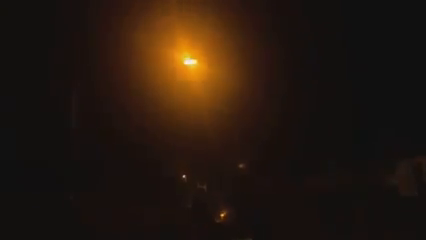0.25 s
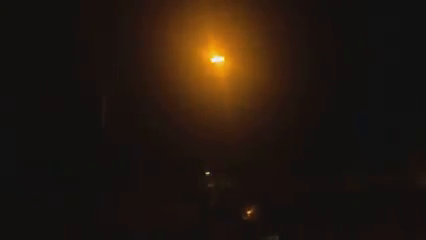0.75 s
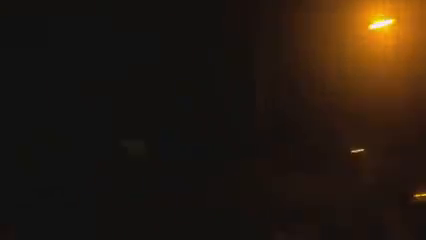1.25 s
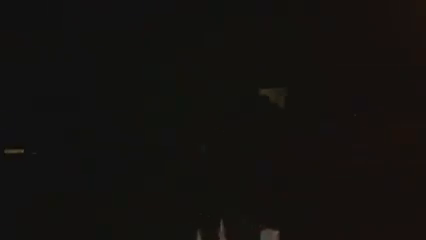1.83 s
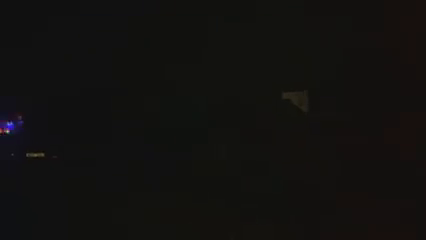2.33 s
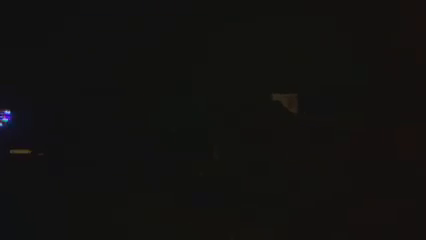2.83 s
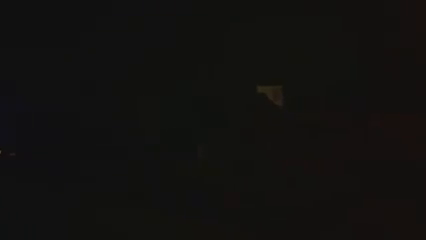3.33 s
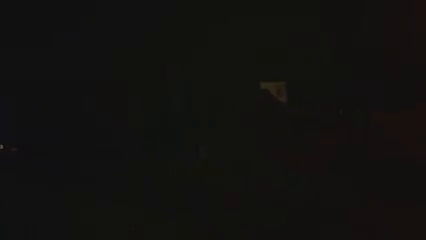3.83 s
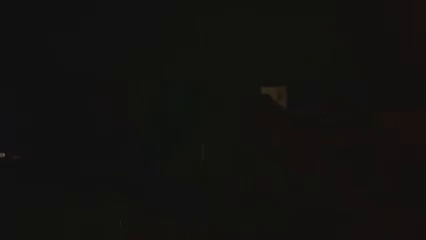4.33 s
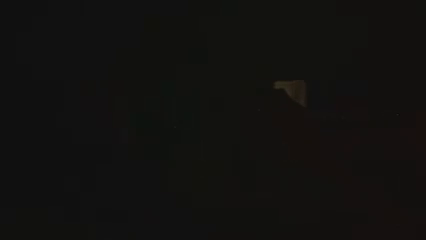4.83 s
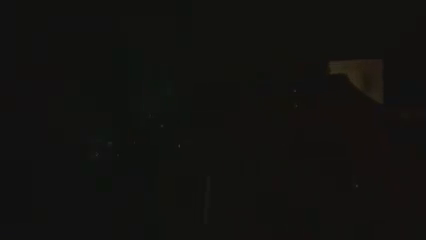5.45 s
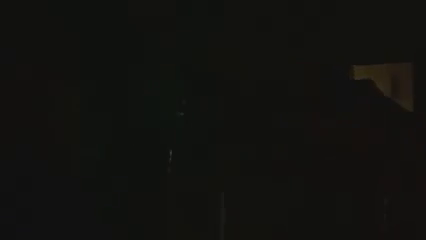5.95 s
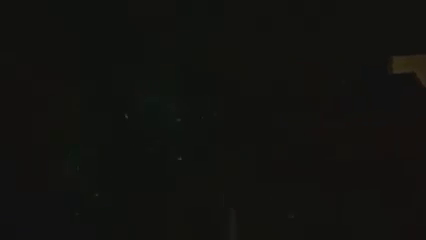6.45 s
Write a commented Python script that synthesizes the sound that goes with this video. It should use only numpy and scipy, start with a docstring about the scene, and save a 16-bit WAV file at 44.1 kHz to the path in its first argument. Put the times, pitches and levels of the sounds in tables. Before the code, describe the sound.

Close, distorted wind buffeting outdoors in darkness: deep thudding gusts, ragged tearing noise and sharp pops, with short lulls baring faint howl and rain.

```python
"""Storm wind buffets the two microphone ports of a hand-held camera: large eddies thump in the bass as
slowly and suddenly swelling noise, small ones tear past as rough bands of noise modulated by shed puffs.
Single eddies pop as short wavelets that fall in pitch, and brief noise bursts crackle over the gusts.
Between gusts come a far howl of narrow-band noise, rain hiss, patter and spray; drops tick on the housing.
The camera sums the bass to mono, rounds it, limits the peaks and cuts the top."""
import sys
import numpy as np
from scipy import signal
from scipy.fft import rfft, irfft, next_fast_len
from scipy.io import wavfile
from scipy.ndimage import uniform_filter1d, minimum_filter1d

SR = 44100
rng = np.random.default_rng(int(sys.argv[2]) if len(sys.argv) > 2 else 0)


def dump(signal):
    """Clip the signal to [-1, 1] and save it as 16-bit WAV at the path in sys.argv[1]."""
    limited = np.clip(np.atleast_2d(signal).T, -1, 1)
    pcm = np.round(limited * 32767).astype(np.int16)
    wavfile.write(sys.argv[1], SR, pcm)


N = 295029  # samples, 6.69 s

# Slow swell of the large eddies rocking the membranes: time_s, level_db
RUMBLE_SWELL = [(0.0, -34), (0.15, -25.5), (0.3, -14), (0.37, -15), (0.95, -22), (1.2, -14.5),
                (1.58, -33.5), (1.9, -13.5), (2.14, -34), (2.3, -30), (2.53, -12.5), (2.96, -23),
                (3.39, -11), (3.58, -19), (4.75, -25.5), (4.81, -13), (5.0, -30), (5.33, -28), (5.4, -11.5),
                (5.55, -18.5), (5.87, -11.5), (6.18, -18.5), (6.5, -22.5), (6.69, -18.5)]
# Single large eddies that thump: peak_time_s, level_db
THUMPS = [(0.034, -21), (0.071, -27), (0.114, -18), (0.341, -12), (0.388, -7), (0.443, -9), (0.558, -8.5),
          (0.62, -14.5), (0.693, -18.5), (0.764, -14), (0.815, -11), (0.889, -7.5), (0.941, -13),
          (1.073, -8.5), (1.169, -7), (1.256, -12), (1.337, -16.5), (1.469, -16.5), (1.539, -13),
          (1.684, -19), (1.731, -18.0), (1.774, -9.5), (1.812, -16.5), (1.897, -11.5), (2.012, -15),
          (2.056, -23.5), (2.102, -23.5), (2.191, -20.5), (2.351, -13), (2.472, -8.5), (2.557, -15),
          (2.612, -8), (2.7, -15), (2.749, -10.5), (2.858, -13), (2.915, -8), (2.983, -15.5),
          (3.031, -12.5), (3.076, -4.5), (3.167, -3.5), (3.24, -5.5), (3.289, -13.5), (3.357, -8),
          (3.425, -4), (3.519, -3.5), (3.557, -5.5), (3.64, -16), (3.752, -14), (3.824, -9.5),
          (3.903, -10.5), (3.939, -9.5), (4.016, -9), (4.067, -10.0), (4.113, -12.5), (4.191, -15.5),
          (4.26, -8.5), (4.308, -15), (4.397, -7.0), (4.515, -5.5), (4.571, -8.5), (4.64, -15),
          (4.695, -16.5), (4.859, -11.5), (4.919, -15), (4.968, -18), (5.055, -8.5), (5.19, -10),
          (5.285, -18.5), (5.451, -13), (5.498, -15), (5.621, -7), (5.754, 0), (5.828, -4), (5.889, -16),
          (5.981, -2.5), (6.088, -7.0), (6.234, -11), (6.33, -14.5), (6.375, -9.5), (6.467, -18),
          (6.607, -12)]
# Relative spectrum of the rocking: frequency_hz, density_db (per Hz)
RUMBLE_SPECTRUM = [(15, -46), (26, -13), (48, -1.5), (70, 3), (200, -15), (260, -41), (440, -120)]
# Buffets that sweep the ports: peak_time_s, hold_s, small_eddies_db, middling_eddies_db, brightness_db
BUFFETS = [(0.008, 0.013, -64, -17.5, -3.5), (0.306, 0.07, -41, -11.5, -11), (0.533, 0.038, -17, -5, -11),
           (0.59, 0.0077, -22, -11.5, -15.5), (0.76, 0.13, -36.5, -19, -17),
           (0.9, 0.031, -36.5, -15.5, -2.5), (1.104, 0.037, -18, -9.5, -9),
           (1.227, 0.016, -29, -17.5, -15.5), (1.332, 0.091, -52, -13.5, -23),
           (1.515, 0.0056, -28, -15, -30), (1.775, .07, -35, -16, -4), (1.846, 0.1, -32, -13.5, -1),
           (2.388, 0.12, -62, -16.5, 1), (2.467, 0.033, -19.5, -14.5, -9.5),
           (2.518, 0.019, -7.5, -7, -10.5), (2.564, 0.036, -21, -26, -9.5),
           (2.611, 0.048, -16.5, -14.5, -9.5), (2.649, 0.033, -24.5, -25, -0.5),
           (2.719, 0.02, -36, -17, -1), (2.772, 0.015, -30, -16, -29), (2.927, 0.0071, -41, -18, 1),
           (3.019, 0.0049, -19, -10, -15), (3.069, 0.013, -10.5, -10.5, -38),
           (3.158, 0.008, -24.5, -13, -14), (3.205, 0.048, -30, -19, -13), (3.289, 0.047, -31, -21, -9),
           (3.396, 0.011, -28, -7, -5.5), (3.419, 0.03, -21, -7, -16), (3.465, 0.02, -14, -11.5, -6),
           (3.498, 0.012, -17, -2.5, -22), (3.53, 0.0085, -8, -4, -13.5), (3.66, 0.046, -18, -13.5, -9),
           (3.808, 0.032, -27, -11.5, -10.5), (3.899, 0.02, -24.5, -14.5, -12),
           (3.94, 0.08, -34, -32, -1.5), (4.007, 0.036, -34, -12.5, -15), (4.212, 0.01, -37, -14.5, -6),
           (4.259, 0.0021, -22, -11, -1), (4.388, 0.04, -42.5, -34, 0), (4.477, 0.085, -43.5, -12.5, -4),
           (4.543, 0.034, -22, -17, -8.5), (4.632, 0.0079, -24, -13, -21), (4.65, 0.025, -31, -20, -48),
           (4.801, 0.1, -40, -20.5, -11.5), (5.029, 0.024, -40, -18, -7), (5.061, .01, -38, -29, -7),
           (5.185, 0.018, -45, -16, -25), (5.344, 0.011, -55, -20, -35), (5.397, 0.036, -18, -6, -37),
           (5.486, 0.078, -28.5, -11, -15), (5.579, 0.028, -16.5, -11.5, -17), (5.63, 0.014, -13, -13, -8),
           (5.679, 0.064, -30, -10.5, -2), (5.743, 0.025, -16.5, -13.5, -9.5),
           (5.796, 0.026, -32.5, -13, -4), (5.892, 0.023, -18, -13, -10.5), (5.957, 0.065, -20, -12.5, -9),
           (6.053, 0.026, -27.5, -13, -8), (6.214, 0.0091, -15, -13, -7.5), (6.239, 0.033, -21, -10.5, -18),
           (6.277, 0.035, -35, -15, -14), (6.382, 0.077, -49, -12, -10), (6.573, 0.054, -54, -15.5, -2.5)]
# Bands the eddies fill: low_hz, high_hz, level_db, small_eddy_share (ratio), brightness_share (ratio)
EDDY_BANDS = [(123, 298, -3, 0.03, 0.18), (309.6, 475, -8.5, 0.23, 0.26), (525, 744, -4, 0.93, 0.036),
              (720, 1193, -4, 0.86, 0.33), (1174, 2150, -4, 0.94, 1.01), (2085, 2825, -14.5, 0.82, 1.24),
              (2850, 4230, -20, 1.27, 1.06)]
# The far scene between gusts: time_s, howl_db, rain_hiss_db, patter_db, fine_spray_db
FAR_LEVELS = [(0.0, -50.5, -60, -81, -94), (0.24, -44, -53.5, -78, -95), (0.45, -41, -51.5, -66, -73),
              (0.61, -54, -54.5, -66.5, -73), (0.91, -37, -57, -72.5, -84), (1.2, -47, -54, -72, -78),
              (1.25, -44, -54.5, -66, -68), (1.52, -40, -53.5, -61.5, -68), (1.58, -43, -47.5, -58, -60),
              (1.81, -36, -46.5, -56, -60.5), (2.25, -45, -48, -59, -62), (2.4, -36.5, -47, -60, -71),
              (2.59, -42, -54, -63, -64.5), (2.89, -40, -44, -57, -62), (3.33, -37.5, -46.5, -55.5, -61.5),
              (3.8, -40, -49.5, -61.5, -67), (4.19, -46, -48.5, -60, -63), (4.43, -48, -48.5, -61, -69),
              (4.55, -52, -48, -55, -64), (4.72, -44, -58, -68, -70), (4.81, -51, -51, -57.5, -67),
              (5.14, -50, -47.5, -58, -60.5), (5.4, -51, -48, -59.5, -65), (5.57, -43, -47, -63, -68),
              (5.81, -44, -45.5, -63.5, -67), (5.96, -24.5, -49, -61, -75), (6.15, -41.5, -53.5, -73, -79),
              (6.43, -41.5, -49.5, -68, -71.5), (6.69, -58, -50, -73, -75)]
# Relative spectrum of the rain hiss: frequency_hz, density_db (per Hz)
RAIN_SPECTRUM = [(470, -50), (800, 8.5), (1190, 10), (1610, -1.5), (1780, 6.5), (2090, 5), (3200, -3.5),
                 (3600, 0.5), (4600, 0), (5600, -8), (6600, -4), (7300, -15), (7900, -10), (9880, -32.5),
                 (16700, -120)]
# Relative spectrum of the fine spray: frequency_hz, density_db (per Hz)
SPRAY_SPECTRUM = [(5410, -33), (9200, -11), (10200, -4), (11100, -2), (12200, -2), (13900, -7.5),
                  (14400, -8), (15500, -18.5)]
# Loudest spikes that tear out of the strongest gusts: start_s, level_db
LOUD_SPIKES = [(0.2466, -34.5), (0.549, -42), (0.562, -39), (0.576, -38), (0.913, -53), (0.92, -37),
               (1.098, -39), (1.105, -35.5), (1.122, -40), (1.905, -45), (1.932, -47), (2.512, -33),
               (2.525, -34), (2.53, -28), (2.632, -38), (2.643, -39), (2.655, -36), (2.674, -43),
               (3.45, -19.5), (3.459, -21), (3.472, -30), (3.484, -41), (3.51, -24), (3.535, -15.5),
               (3.547, -40), (3.676, -40), (3.69, -37), (3.747, -33), (4.257, -32), (4.262, -29),
               (4.342, -30), (4.676, -24.5), (5.186, -33.5), (5.4207, -33), (5.628, -47), (5.641, -43),
               (5.682, -38), (5.718, -23), (5.732, -19.5), (5.7444, -31), (5.7, -32), (5.765, -41),
               (5.777, -26), (5.807, -23), (5.819, -23), (5.8481, -30), (5.868, -20.5), (5.892, -27.5),
               (5.994, -38), (6.017, -40), (6.0377, -23.5), (6.053, -24.5), (6.0694, -31), (6.077, -32),
               (6.196, -36), (6.205, -44), (6.222, -48)]
# Single eddies that pop on a port: start_s, level_db, pitch_hz (nominal, the pitch falls through it),
# treble_db (re level), port_balance (no unit, positive is left), wake_db (re level)
POPS = [(0.302, -8.5, 435, -49, 2, -22), (0.362, -13.5, 533, -45, 2, -6), (0.532, -9.5, 650, -30, 9, -11),
        (0.549, -10, 483, -4, -4, 1), (0.57, -19, 527, -5, -7, -1), (0.603, -3.5, 390, -33, -1, -19),
        (0.771, -15.5, 496, -35, 0, 2), (0.803, -10, 525, -43, 0, -18), (0.821, -13, 540, -40, 0, -4),
        (0.863, -16.5, 665, -22, -1, 3.5), (0.887, -11.5, 480, -26, -1, 1),
        (0.912, -12.5, 580, -11, -6, 4.5), (0.919, -7.5, 506, -4, -5, -12), (1.061, -20, 455, -23, 1, -10),
        (1.096, -23.5, 604, 6, 1, -8), (1.109, 3, 416, -21.5, -2, -13), (1.122, -7.5, 610, -24, 6, 2),
        (1.204, -22, 460, -19, 2, -7), (1.236, -6, 583, -32, 2, -9), (1.286, -15.5, 467, -34, 0.0, -6),
        (1.328, -19, 490, -36, 0, -13), (1.369, -18, 444, -40, -2, -7), (1.401, -24, 680, -29, -2, -7),
        (1.453, -12, 540, -53, 6, -10), (1.507, -12.5, 476, -33, 0.0, -12),
        (1.529, -12.5, 567, -26, 0, -17), (1.757, -12.5, 570, -13, 4, 0.5), (1.763, -8, 430, -19, -3, -7),
        (1.788, -14, 430, -24, 2, -4), (1.805, -11.5, 794, -26, -3, 0), (1.818, -20, 700, -21, 2, 0),
        (1.832, -19.5, 600, -14, -3, 9), (1.86, -15.5, 430, -11, -4, 13.5), (1.873, -18, 500, 1, 0, -6),
        (1.907, -8.5, 444, -7, -2, 2), (1.932, -12, 520, -12, 5, 5), (2.083, -19, 408, -40, -2, -29),
        (2.324, -18, 510, -20, 2, -9), (2.38, -19.5, 553, -31, 5, -6), (2.472, -10, 764, -34, -3, 1),
        (2.481, -7, 780, -29, 0, -1), (2.497, -9, 471, -26, 1, 2), (2.508, -16, 480, -23, -0.5, -12),
        (2.527, -9, 503, -18, 4, -14), (2.544, -2.5, 455, -29, 16, -4), (2.589, -8.5, 464, -27, 5, 0),
        (2.615, -3.5, 760, -39, -5, -18), (2.655, -10, 507, -14, -3, 0), (2.675, -12, 452, -17, -6, -11),
        (2.69, -23, 430, -11, 0, -13), (2.713, -18.5, 865, -3, -5, 6), (2.755, -13.5, 474, -33, 2, -2.5),
        (2.787, -14.5, 600, -39, 2, -10), (2.943, -10, 840, -38, 1, -6), (3.007, -15.5, 477, -24, 4, 5),
        (3.019, -12, 471, -28, -1, 0), (3.071, -3, 530, -37, -1, -4), (3.094, -7.5, 431, -34, -4, -12),
        (3.126, -16, 460, -35, -4, -9), (3.165, -14, 630, -25, -9, 4), (3.228, -6.5, 533, -26, -5, -1),
        (3.27, -12, 430, -30, -3, -11), (3.295, -10.5, 610, -34, -6, -4), (3.419, -0.5, 477, -21, 2, -1),
        (3.44, -10, 425, -27, 0, 4), (3.462, -8, 443, -9, -1, -11), (3.476, -9, 500, -25, 2, -2),
        (3.487, -8.5, 503, -10, 8, -1), (3.533, 7, 415, -7, 3, -14), (3.544, -2, 500, -18, 8, -13),
        (3.567, -27, 600, -20, 0, -6), (3.662, -12, 450, -12, 9, -9), (3.788, -17.5, 430, -15, -2, 0),
        (3.822, -10, 490, -24, -1, -3), (3.866, -11.5, 700, -31, 6, -8), (3.907, -15.5, 446, -25, 1, -2),
        (3.949, -11, 920, -27, 0, -22), (3.978, -12, 416, -13, 0, -1), (4.006, -9.5, 666, -23, -1, -3),
        (4.2, -19.5, 594, -30, 0, -16), (4.213, -13, 438, -35, -2, -15), (4.243, -26, 495, -27, -2, -11),
        (4.264, -7.5, 461, 0.5, -7, 2), (4.386, -22, 422, -9, -1, 2), (4.415, -26, 810, 0, 2, -9),
        (4.478, -13.5, 437, -40, 0, -18), (4.504, -13, 575, -35, 8, -2), (4.557, -4, 425, -17, -1, -19),
        (4.577, -13.5, 580, -20, -1, 0), (4.611, -23, 495, -9, -2, 3), (4.676, -11.5, 910, -13, 7, -7),
        (4.68, 4, 710, -16, 13, -14), (4.804, -17.5, 523, -24, 0.0, -6), (4.813, -32, 500, 6, 2, -8),
        (4.855, -24, 522, -30, 2, -9), (4.91, -25, 600, -20, 0, -2), (5.02, -9, 442, -51, 6, -5),
        (5.085, -25, 594, -23, 0, -8), (5.188, -17, 483, -13, -3, 7), (5.353, -16, 430, -45, 0, -20),
        (5.388, -18, 444, -23, 0.0, -13), (5.425, -6.5, 550, -41, 3, -19), (5.439, -12, 433, -35, 3, -9),
        (5.482, -18, 427, -18, -2, 0), (5.525, -6.5, 465, -37, 11, 2), (5.544, -4, 510, -22, -2, -3),
        (5.572, -22, 610, -26, 7, -10), (5.592, -2, 479, -32, 4, 2), (5.61, -12, 490, -15, -4, 1),
        (5.628, -5, 570, -23, 10, 6.5), (5.645, -7, 500, -23, 1, -10), (5.682, -12, 760, -7, -6, -3),
        (5.743, -6.5, 660, -31, -3, 4), (5.763, -6, 754, -35, -2, -12), (5.891, 3.5, 572, -41, -2, -5),
        (5.909, -4, 810, -24, 3, -24), (5.965, -11.5, 680, -35, -8, 2), (5.992, 3, 494, -21, 2, -4.5),
        (6.017, -16, 596, -17, 0, -12), (6.062, -8, 480, -31, 3, -5), (6.17, -13, 430, -30, -3, 2),
        (6.203, -8.5, 644, -8, 2, 3), (6.224, -4.5, 680, -24, 0.5, 1.5), (6.235, -9, 593, -21, 0, -3),
        (6.289, -15, 554, -28, -1, -9), (6.359, -10.5, 480, -29, -1, -12), (6.384, -16.5, 516, -32, 1, -9),
        (6.614, -13, 513, -33, -1, -11), (6.656, -17, 950, -16, 0, -6)]
# Drops that tick on the housing: start_s, level_db
DROPS = [(1.2381, -42), (1.2865, -45), (2.2967, -42), (2.859, -29), (3.5333, -27), (3.6237, -43),
         (3.9497, -32.5), (4.1994, -45), (4.3425, -33), (4.8105, -36), (5.0225, -45), (5.1103, -36)]

THUMP_RISE_DB_S, THUMP_FALL_DB_S = 399, 335.5
RUMBLE_EVEN, RUMBLE_EVEN_MS = .6, 45  # how evenly the membranes rock from cycle to cycle
SMALL_RISE_DB_S, SMALL_FALL_DB_S, SMALL_CALM_DB = 898, 602, -59
MIDDLING_RISE_DB_S, MIDDLING_FALL_DB_S, MIDDLING_CALM_DB = 549.5, 348, -29
SHED_PER_S, SHED_MS = 90, 6
BETWEEN_PUFFS = .42  # steady turbulent hiss, against puffs of rms 1
TREBLE_SMOOTHING = .5  # the bright bands roar on between shed puffs
HOWL_HZ, HOWL_WIDTH_HZ = 550, 220
SPIKE_MS, FAINT_SPIKES_PER_S = 5.8, 110
FAINT_SPIKE_DB = -40  # weakest faint spike, re small eddies plus brightness
RASP_DB, RASP_MS = -10.5, 20  # a softer rasp wraps each loud spike
POP_CYCLES, POP_BASS_DB = 2.99, -4  # mean cycles of a pop; bass re pop level
POP_EDGE_DB, POP_EDGE_SHARE = -0.5, 0.53  # the crack near 1 kHz, and how far it follows the treble
TEAR_MS, WAKE_MS = 5.1, 11.4
DROP_MS = 6.2
DRIFT, DRIFT_PER_S = 0.65, 4.1  # how far and how often the sound drifts at random between left and right
MONO_BELOW_HZ, TOP_HZ = 1170, 15600


def undb(db):
    """Decibel law: amplitude gain of a level in dB."""
    return 10 ** (np.asarray(db) / 20)


def unit(x):
    """Normalisation of power: scale to rms 1."""
    return x / np.sqrt(np.mean(x ** 2))


def curves(table):
    """Linear interpolation: each column after time_s, one value per sample."""
    s, *columns = np.transpose(table)
    return [np.interp(np.arange(N) / SR, s, column) for column in columns]


def noise():
    """Statistical independence: two noises, for what the ports share and what differs between them."""
    return rng.standard_normal((2, N))


def band(x, lo_hz, hi_hz, order=2):
    """Band-pass filtering: keep the energy between two frequencies."""
    return signal.sosfilt(signal.butter(order, [lo_hz, hi_hz], "bandpass", fs=SR, output="sos"), x)


def colour(x, spectrum):
    """Spectral shaping: weight a noise by (Hz, dB) points, to rms 1."""
    hz, db = np.transpose(spectrum)
    size = next_fast_len(N)
    bin_hz = np.arange(size // 2 + 1) * SR / size
    # interpolate on a log frequency axis; + 1 keeps 0 Hz finite
    gain = undb(np.interp(np.log(bin_hz + 1), np.log(hz), db, left=-90, right=-90))
    return unit(irfft(rfft(x, size) * gain, size)[..., :N])


def walk(rate):
    """Slow random modulation: levels held 1 / rate s, slewed twice, to rms 1."""
    hold = max(int(SR / rate), 1)
    steps = np.repeat(rng.standard_normal(N // hold + 1), hold)
    return unit(uniform_filter1d(uniform_filter1d(steps, hold), hold)[:N])


def swells(s, hold_s, db, rise_db_s, fall_db_s, calm_db):
    """Exponential growth and decay: level in dB of the strongest event over a calm, and which one leads."""
    step = 32  # samples
    t = np.arange(0, N + step, step) / SR - s[:, None]
    rise = rise_db_s * np.minimum(t, 0)
    fall = fall_db_s * np.maximum(t - hold_s[:, None], 0)
    each = db[:, None] + rise - fall
    top = np.repeat(each.max(axis=0), step)[:N]
    leader = np.repeat(each.argmax(axis=0), step)[:N]
    return np.maximum(uniform_filter1d(top, step), calm_db), leader


def bursts(table, ms, lo_hz, hi_hz):
    """Amplitude modulation: band noise under half-sine envelopes of (start_s, level_db)."""
    envelope, x = np.zeros(N + SR), np.linspace(0, 1, int(ms * SR / 1000))
    for s, db in table:
        i = int(s * SR)
        # noise peaks near three times its rms
        envelope[i:i + len(x)] += undb(db) / 3 * np.sin(np.pi * x)
    hiss = unit(band(noise(), lo_hz, hi_hz))
    return band(envelope[:N] * hiss, lo_hz, hi_hz, order=4)


def rumble():
    """Turbulent pressure on a membrane: large eddies rock it as bass noise that thumps for a few cycles."""
    s, db = np.transpose(THUMPS)
    calm_db = curves(RUMBLE_SWELL)[0]
    level_db, _ = swells(s, 0 * s, db, THUMP_RISE_DB_S, THUMP_FALL_DB_S, calm_db)
    rocking = colour(noise(), RUMBLE_SPECTRUM)
    half = RUMBLE_EVEN_MS * SR // 2000
    swing = uniform_filter1d(uniform_filter1d(rocking ** 2, half), half)
    # dividing by part of its own swing evens the rocking
    return undb(level_db) * unit(rocking / (swing + .05) ** (RUMBLE_EVEN / 2))


def buffets():
    """Gust envelopes: levels of small and middling eddies, and the brightness of the leading buffet."""
    s, hold_s, small_db, middling_db, bright_db = np.transpose(BUFFETS)
    small_db, leader = swells(s, hold_s, small_db, SMALL_RISE_DB_S, SMALL_FALL_DB_S, SMALL_CALM_DB)
    middling_db, _ = swells(s, hold_s, middling_db,
                            MIDDLING_RISE_DB_S, MIDDLING_FALL_DB_S, MIDDLING_CALM_DB)
    return small_db, middling_db, uniform_filter1d(bright_db[leader], size=600)


def shedding():
    """Vortex shedding: brief puffs of scattered size at uneven, gamma-distributed intervals."""
    count = int(SHED_PER_S * N / SR)
    when = np.cumsum(rng.gamma(3, 1 / 3, count)) * SR / SHED_PER_S
    starts = np.zeros(N)
    starts[(when % N).astype(int)] = undb(3.5 * rng.standard_normal(count))
    return unit(signal.fftconvolve(starts, np.hanning(SHED_MS * SR // 1000))[:N])


def eddies():
    """Modulated turbulence: bands of noise swell together with the shed puffs, and each flutters alone."""
    small_db, middling_db, bright_db = buffets()
    passing = (shedding() + BETWEEN_PUFFS) * undb(2.2 * walk(30))
    out = 0
    for lo_hz, hi_hz, db, small, bright in EDDY_BANDS:
        puffs = passing ** (1 - TREBLE_SMOOTHING * bright)
        flutter_db = 1.8 * walk(60) + 2.5 * bright * walk(25)
        pressure = noise() * puffs * undb(flutter_db)
        level_db = db + (1 - small) * middling_db + small * small_db + bright * bright_db
        out = out + unit(band(pressure, lo_hz, hi_hz, order=3)) * undb(level_db)
    return out


def far():
    """Filtered noise: howl round far corners, rain on leaves, patter ringing the port cavity, fine spray."""
    howl_db, rain_db, patter_db, spray_db = curves(FAR_LEVELS)
    # patter and spray come in quick sheets
    sheets_db = .5 * walk(7) + .7 * walk(25) + 1.3 * walk(55)
    howl = unit(band(noise(), HOWL_HZ - HOWL_WIDTH_HZ / 2, HOWL_HZ + HOWL_WIDTH_HZ / 2))
    rain = colour(noise() * undb(1.2 * walk(20) + .8 * walk(6)), RAIN_SPECTRUM)
    patter_flutter_db = .8 * walk(22) + 1.8 * walk(80) + 1.5 * walk(300)
    patter = unit(band(noise() * undb(patter_flutter_db), 7900, 8900))
    patter = patter * np.array([[1], [.3]])  # mostly shared by the ports
    spray = colour(noise() * undb(1.1 * walk(25) + 1.5 * walk(300)), SPRAY_SPECTRUM)
    fine = (patter * undb(patter_db) + spray * undb(spray_db)) * undb(sheets_db)
    return howl * undb(howl_db) + rain * undb(rain_db) + fine


def crackle():
    """Intermittency of turbulence: loud spikes wrapped in rasp, and faint ones that follow the buffets."""
    when, size = rng.random((int(FAINT_SPIKES_PER_S * N / SR), 2)).T
    small_db, _, bright_db = buffets()
    i = (when * N).astype(int)
    faint = zip(i / SR, small_db[i] + bright_db[i] + FAINT_SPIKE_DB + 12 * size)
    # the rasp starts 9 ms before its spike
    rasp = bursts([(s - .009, db + RASP_DB) for s, db in LOUD_SPIKES], RASP_MS, 1900, 6600)
    return rasp + bursts([*LOUD_SPIKES, *faint], SPIKE_MS, 1900, 6900)


def wavelet(hz, cycles, phase):
    """Dispersion: a few cycles fall in pitch, as the camera's processing delays lows behind highs."""
    length = cycles / hz * SR
    x = np.arange(int(length)) / length
    envelope = np.sin(np.pi * x ** 1.155) ** 2
    return envelope * np.sin(2 * np.pi * cycles * (1.429 * x - 0.55 * x ** 2) + phase)


def pops():
    """Transient pulses: bass, tear and edge start within 2 ms, just ahead of the puff; a noisy wake is added."""
    out = np.zeros((2, N + SR))
    chance = rng.random((len(POPS), 8))
    for (s, db, hz, treble_db, port_balance, _), c in zip(POPS, chance):
        cycles = POP_CYCLES * (.8 + .4 * c[5])
        edge_db = POP_EDGE_DB + POP_EDGE_SHARE * treble_db
        # each part: pitch in Hz, gain in dB, cycles, start offset in s
        parts = ((hz, 0, cycles, 0),
                 (950 + 450 * c[6], edge_db, cycles, -.0005),
                 (200 + 160 * c[1], POP_BASS_DB, 0.69 * cycles, -.002))
        for (part_hz, gain_db, turns, offset_s), phase in zip(parts, 2 * np.pi * c[[2, 7, 4]]):
            i = int((s + offset_s) * SR)
            puff = undb(db + gain_db) * wavelet(part_hz, turns, phase)
            # the differing part makes most pops strike one port harder than the other
            out[0, i:i + len(puff)] += puff
            out[1, i:i + len(puff)] += puff * np.tanh(port_balance / 4)
    wakes = [(s, db + wake_db) for s, db, *_, wake_db in POPS]
    tears = [(s - .0015, db + treble_db) for s, db, _, treble_db, *_ in POPS]
    shared, differing = bursts(tears, TEAR_MS, 1310, 2730)
    balance = np.tanh(curves([(p[0], p[4]) for p in POPS])[0] / 4)
    tear = np.array([shared, balance * shared + 0.52 * differing])
    return out[:, :N] + tear + bursts(wakes, WAKE_MS, 233, 1185)


def drops():
    """Impact noise: brief bright bursts as drops tick on the housing."""
    return bursts(DROPS, DROP_MS, 7400, 14000)


def scene():
    """Sum and difference of two channels: the sound drifts at random between left and right."""
    shared, differing = rumble() + eddies() + far() + crackle() + pops() + drops()
    drift = DRIFT * np.tanh(walk(DRIFT_PER_S))
    differing = drift * shared + np.sqrt(1 - drift ** 2) * differing
    return np.array([shared + differing, shared - differing])


def record(dry):
    """Nonlinear gain and filtering: bass to mono and rounded, peaks limited, top cut."""
    mid, side = (dry[0] + dry[1]) / 2, (dry[0] - dry[1]) / 2
    side = signal.sosfilt(signal.butter(6, MONO_BELOW_HZ, "highpass", fs=SR, output="sos"), side)
    bass = signal.sosfiltfilt(signal.butter(2, 1200, fs=SR, output="sos"), mid)
    rounded = bass / (1 + np.abs(bass / .95) ** 4) ** .25
    mid = mid - bass + rounded
    both = np.array([mid + side, mid - side])
    # a quick limiter looks a millisecond ahead and turns both channels down together
    peak = np.abs(both).max(axis=0)
    room = minimum_filter1d(np.minimum(1, .97 / (peak + 1e-9)), size=97)
    both = both * uniform_filter1d(room, size=49)
    return signal.sosfilt(signal.ellip(10, .2, 80, TOP_HZ, fs=SR, output="sos"), both)


dry = scene()
out = record(dry)
dump(out)
```